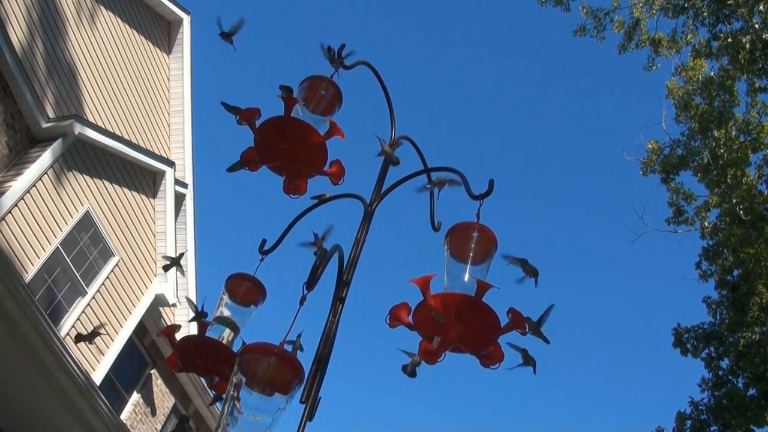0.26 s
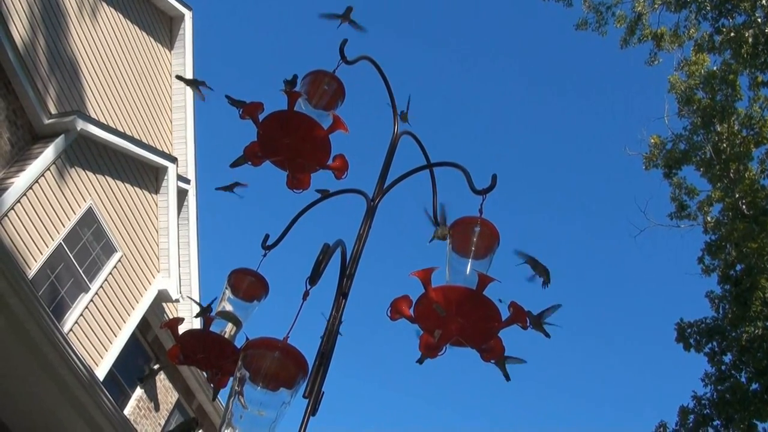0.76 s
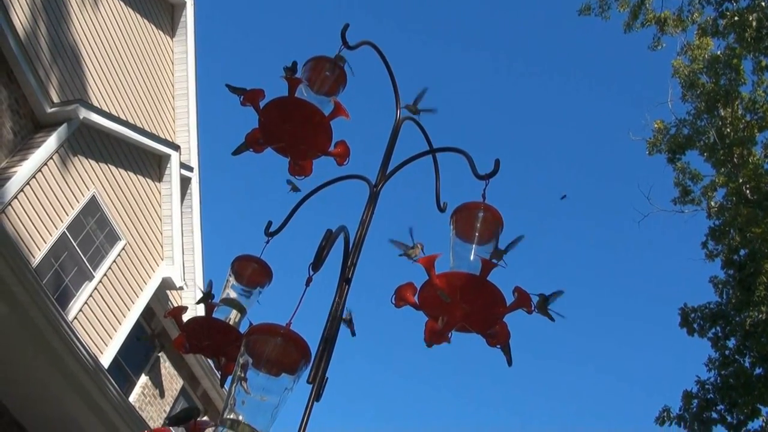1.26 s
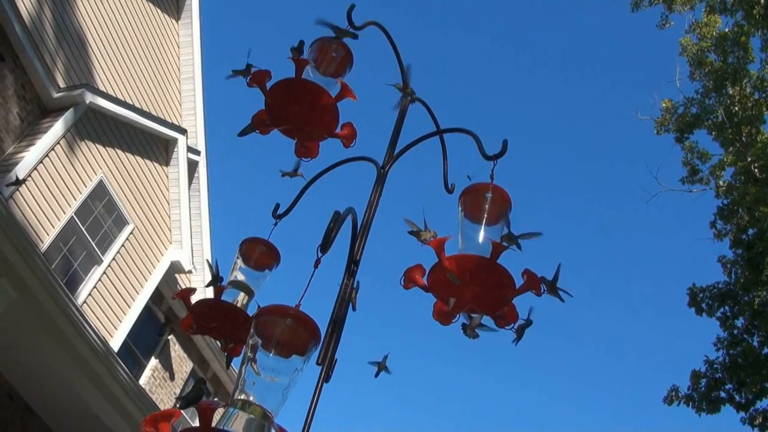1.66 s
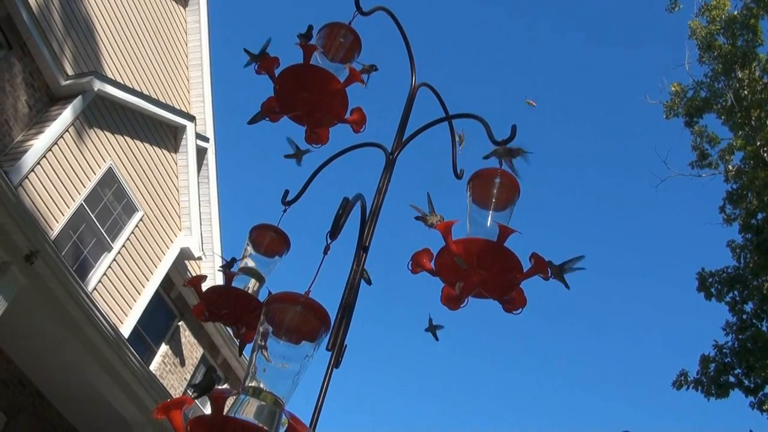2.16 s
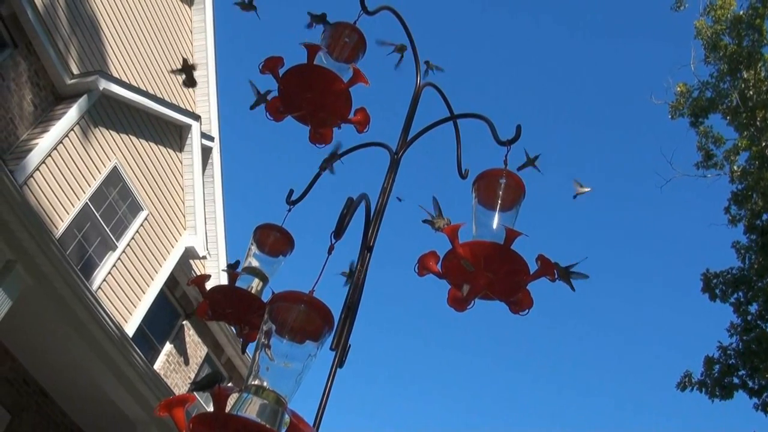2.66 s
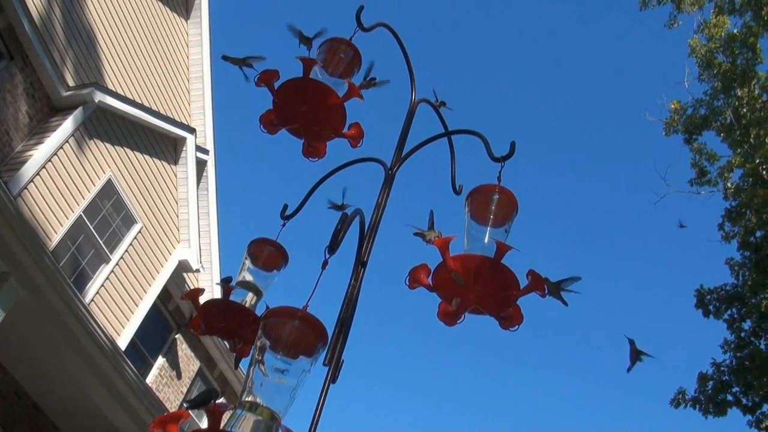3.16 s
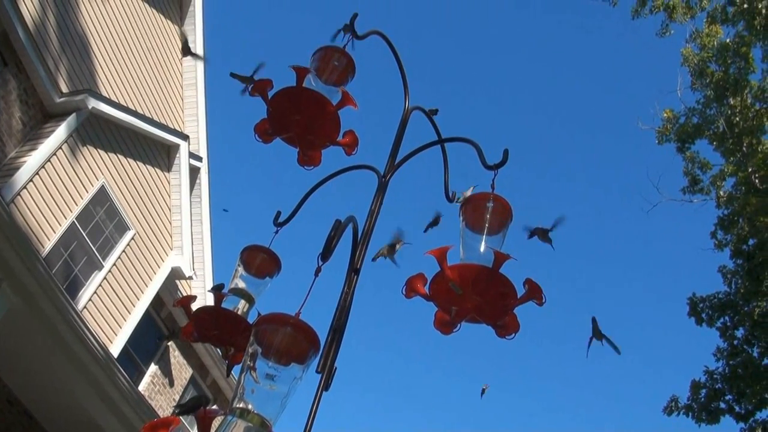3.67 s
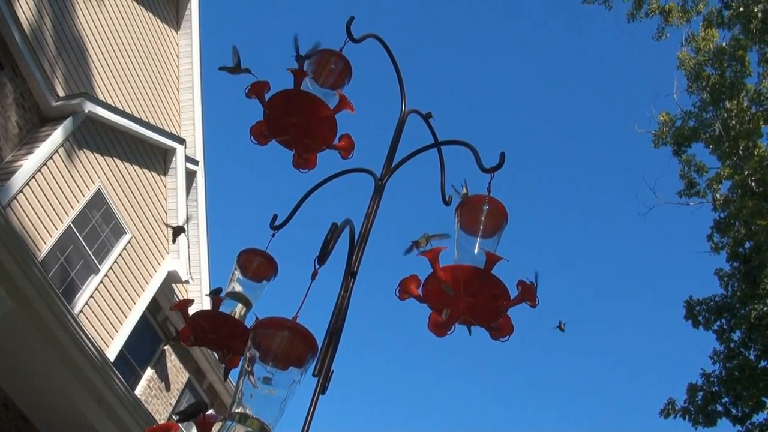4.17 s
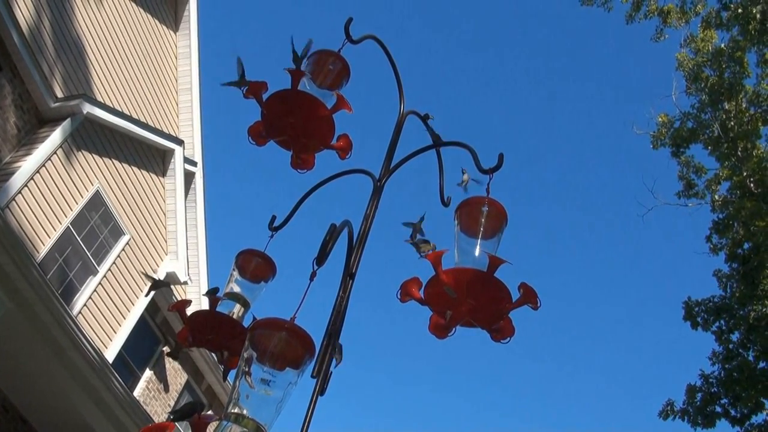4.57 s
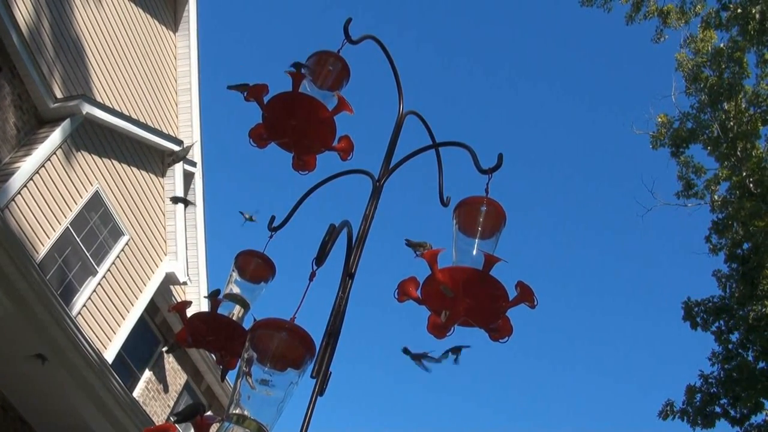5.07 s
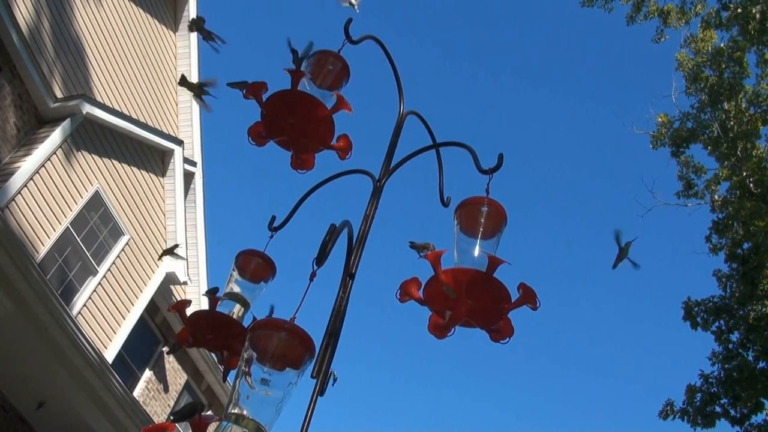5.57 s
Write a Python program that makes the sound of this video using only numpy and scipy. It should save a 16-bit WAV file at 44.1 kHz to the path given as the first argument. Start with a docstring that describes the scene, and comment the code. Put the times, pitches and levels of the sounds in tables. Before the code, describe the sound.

Beside a house, several hummingbirds hover around feeders. Their wings make a continuous low hum that swells, sags and beats unevenly, with soft airy swishing. Over it come tiny high chips, thin whistles, twittering trills and scratchy rasps, thickest around one second and again near three, then thinning out. Faint insects shrill steadily over a light outdoor hush. Stereo microphone close to the birds, calls scattered left and right with a short wall echo.

```python
"""Hummingbirds at the feeders

Hummingbirds crowd round garden feeders beside a house. Their wings hum at twice the wingbeat, beat against each other
and swish on each stroke. They squabble in thin whistles, falling chips, twittering trills, harsh rasps and a buzzy
scold, made from gliding tones, harmonics and hiss; feathers scuffle and dry snaps tick. The house wall echoes all
these but the steady wings; filtered noise makes insects shrilling in the trees over a faint outdoor hush."""
import sys
import numpy as np
from scipy import signal
from scipy.fft import rfft, irfft
from scipy.io import wavfile
from scipy.ndimage import map_coordinates

SR = 44100
rng = np.random.default_rng(int(sys.argv[2]) if len(sys.argv) > 2 else 0)


def to_wav(s):
    """Save 16-bit WAV."""
    ch = np.atleast_2d(s).T  # columns
    pcm = np.round(np.clip(ch, -1, 1) * 32767)  # PCM
    wavfile.write(sys.argv[1], SR, pcm.astype(np.int16))


N = 256662
T = np.arange(N) / SR
TOP_HZ = 15700  # nothing much is heard above this
BEAK_HZ = 12100  # the open beak rings here, towards where the bird faces

# Chips that start higher ring brighter, with less of the fundamental (the lowest harmonic).
# Each row: start pitch in Hz, brightest frequency in Hz, level of the added fundamental in dB.
CHIP_TONES = [(2514, 5370, -7), (2800, 7090, -23)]


def undb(db):
    """Turn decibels into a gain."""
    return 10 ** (np.asarray(db) / 20)


def level(x, db):
    """Scale a sound to an rms (average strength) in dB."""
    return x * undb(db) / np.sqrt(np.mean(x ** 2))


def walk(rate, size=N):
    """Smooth chance with a spread near 1 that turns about rate times a second."""
    points = rng.standard_normal(4096)
    return map_coordinates(points, [np.arange(size) / SR * rate], order=3, mode="wrap")


def colour(x, points):
    """Filter by a spectrum of (Hz, dB) points."""
    hz, db = np.transpose(points)
    bins = np.maximum(np.fft.rfftfreq(N, 1 / SR), 1)
    gain = undb(np.interp(np.log(bins), np.log(hz), db))
    return irfft(rfft(x) * gain, N)


def diffuse(alike_hz):
    """Noise from all round: long waves reach both microphones alike, short ones do not."""
    mid, side = rfft(rng.standard_normal((2, N)))
    alike = np.sinc(np.fft.rfftfreq(N, 1 / SR) / alike_hz / 2) * .9
    mid = mid * np.sqrt(1 + alike)
    side = side * np.sqrt(1 - alike)
    return irfft(np.array([mid + side, mid - side]), N)


def air(size, low_hz=2300, high_hz=11000):
    """Turbulent air: a broad hiss with an rms of 1."""
    band = signal.butter(2, [low_hz, high_hz], "band", fs=SR, output="sos")
    return level(signal.sosfilt(band, rng.standard_normal(size)), 0)


def add(out, s, x, pan_db):
    """Place a call; the microphone turned away hears it softer and a little later."""
    for channel, side in enumerate((.5, -.5)):
        i = max(int(s * SR - side * pan_db / 6), 0)
        out[channel, i:i + len(x)] += undb(side * pan_db) * x[:N - i]


def progress(length):
    """Run from 0 to 1 through a call."""
    return np.linspace(0, 1, int(length * SR))


def swell(u, rise, fall):
    """A call's loudness shape, with rise and fall as shares of its length."""
    ramp = np.minimum(u / rise, (1 - u) / fall)
    return np.sin(np.pi / 2 * np.clip(ramp, 0, 1)) ** 2


def syrinx(hz, bright_hz, octaves, skirt_db, beak_db=-30, cut_hz=13300):
    """The bird's voice: harmonics of a moving pitch ring broadly in the throat and narrowly in the beak."""
    k = np.arange(1, 10)[:, None]  # harmonic numbers
    throat = np.exp(-.5 * (np.log2(k * hz / bright_hz) / octaves) ** 2)
    skirt = undb(skirt_db) / (1 + bright_hz / (k * hz))
    beak = undb(beak_db) * np.exp(-(10 * np.log(k * hz / BEAK_HZ)) ** 2)
    # the very top is cut
    top_cut = (k * hz < SR / 2) / (1 + (k * hz / cut_hz) ** 16)
    gain = (throat + skirt + beak) * top_cut
    return np.sum(gain * np.sin(k * 2 * np.pi * np.cumsum(hz) / SR), axis=0)


def wing(stroke_hz):
    """One bird's wing tone and the puffs of air that its strokes throw."""
    # Up and down stroke push nearly alike, so the second tone leads.
    # Each row: multiple of the wingbeat, typical level in dB against the other rows.
    wing_orders = [(1, -28), (2, 1.5), (4, -13.5), (6, -24)]
    beat = np.pi * np.cumsum(stroke_hz) / SR  # two strokes make one wingbeat
    tone = 0
    for k, db in wing_orders:
        strength = undb(db + 2.0 * walk(9.8))
        tone = tone + strength * np.sin(k * beat + 0.28 * k * walk(9))
    puffs = 1 + 0.73 * np.cos(2 * beat)
    return level(tone, 0), puffs


def wings(near_db=-6.5, flock_db=-6.5, swish_db=-58.5, lag_s=0.0011, count=4):
    """The nearest bird leads; others, each at its own rate, waver, drift from side to side and beat against it."""
    # The hum's loudness throbs and sags unevenly, as several wing tones beat together.
    # Each row: time in seconds, level in dB before the shares of the near bird and the flock.
    hum_levels = [(0.0, -49), (0.36, -44), (0.49, -54), (0.73, -43.5), (0.92, -51), (1.09, -46),
                  (1.52, -52.5), (1.64, -46), (1.81, -58), (2.1, -46.5), (2.55, -54), (2.78, -48.5),
                  (3.84, -46.5), (4.33, -53), (4.4, -49), (4.8, -49), (5.15, -47), (5.81, -53.5)]
    # Each row: frequency in Hz, strength of the swish there in dB.
    swish_colour = [(68, -20), (95, 12.5), (150, -7), (440, 9), (670, -17.5), (1200, -35)]
    hum_db = np.interp(T, *np.transpose(hum_levels))
    near, puffs = wing(104 * (1 + 0.041 * walk(14)))  # about 104 strokes a second
    flock = 0
    for rate_hz in np.linspace(94, 116, count):
        tone, _ = wing(rate_hz * (1 + 0.04127 * walk(10)))
        # drifting left and right shifts both the timing and the loudness
        side = np.outer([.5, -.5], walk(1.73))
        shifted = np.interp(T + lag_s * side, T, tone)
        flock = flock + shifted * undb(2 * walk(6.5) + side)
    hum = (level(near, near_db) + level(flock, flock_db)) * undb(hum_db)
    # the swish swells with the hum, but by less
    swish = colour(diffuse(alike_hz=656) * puffs, swish_colour) * undb(0.74 * hum_db)
    return hum + level(swish, swish_db)


def garden(hush_db=-53.0, insect_db=-56):
    """A smooth outdoor hush and a chorus of insects shrilling in the trees, both from filtered noise."""
    # Spectrum of the hush. Each row: frequency in Hz, strength in dB.
    hush_colour = [(60, 9.5), (200, 12), (1300, -0.5), (5500, -5), (9500, -6.5), (15800, -14)]
    # Spectrum of the insects. Each row: frequency in Hz, strength in dB.
    insect_colour = [(5000, -66), (7000, -14), (7700, -3.5), (8050, -7.5), (8700, -22.5), (10000, -87)]
    hush = colour(diffuse(alike_hz=253), hush_colour) * undb(.5 * walk(1.0))
    # the insects waver slowly and flicker fast
    insects = colour(diffuse(alike_hz=313), insect_colour) * undb(.5 * walk(1.98) + walk(90))
    return level(hush, hush_db) + level(insects, insect_db)


def chip(start_hz, bright_hz, root_db, beak_db, length=0.03, drop=0.66):
    """The syrinx slackens at once: a clear stack of harmonics dives, never twice at quite the same speed."""
    u = progress(length)
    dive = np.exp(-drop * u * (1 + .1 * rng.standard_normal()))
    hz = start_hz * dive * (1 + .024 * walk(2400, len(u)))
    voice = level(syrinx(hz, bright_hz, octaves=0.27, skirt_db=-8.0, beak_db=beak_db), 0)
    root = level(np.sin(2 * np.pi * np.cumsum(hz) / SR), root_db)
    flutter = undb(2 * walk(500, len(u)))
    return (voice + root + .28 * air(len(u))) * swell(u, .14, .75) * flutter


def add_far_chips(out, far_db=-60, far_until_s=3.7, count=14):
    """Faint chips from birds further off start at chance times, weaker with distance."""
    start_hz, bright_hz, root_db = CHIP_TONES[0]
    for when, pitch, side, distance in rng.uniform(-1, 1, size=(count, 4)):
        far = chip(start_hz * (1 + pitch / 10), bright_hz, root_db, beak_db=-np.inf)
        far = level(far, far_db) / (1 + abs(distance))
        add(out, (when + 1) / 2 * far_until_s, far, 2 * side)


def rasp(length, bright_hz, pitch_share=.53, flutter_hz=220, depth=0.162, sag=.33):
    """A pressed syrinx flutters in fast, uneven pulses while its pitch sags and grows hoarse."""
    u = progress(length)
    flutter = np.sin(2 * np.pi * (u * length * flutter_hz + .25 * walk(130, len(u))))
    hoarse = (.04 + .06 * u) * walk(2200, len(u))
    hz = pitch_share * bright_hz * np.exp(depth * flutter - sag * u + hoarse)
    voice = level(syrinx(hz, bright_hz, octaves=0.38, skirt_db=-3), 0)
    breath = .6 * u * air(len(u), 2300)
    pulses = undb(3 * flutter + 2.5 * walk(400, len(u)))
    return (voice + breath) * pulses * swell(u, .25, .55)


def add_rasps(out):
    """Place the harsh rasps of the pressed syrinx."""
    # Each row: start in seconds, length in seconds, level in dB midway between the sides,
    # brightest frequency in Hz, left minus right in dB.
    rasp_rows = [ (0.102, 0.046, -56, 5450, 10), (0.62, 0.052, -54, 8370, -4),
                 (1.052, 0.063, -47.5, 8460, -5), (1.229, 0.058, -45, 7430, 0),
                 (1.292, 0.065, -48.5, 7220, -7), (1.547, 0.038, -48, 6600, -5.5),
                 (2.533, 0.076, -41.5, 7210, -2), (2.999, 0.03, -51, 8700, -2),
                 (4.263, 0.057, -57.5, 5350, -12.5), (4.601, 0.042, -51, 6360, -4),
                 (4.74, 0.041, -53, 6350, -7)]
    for s, length, db, bright_hz, pan_db in rasp_rows:
        add(out, s, level(rasp(length, bright_hz), db), pan_db)


def whistle(length, start_hz, middle_hz, end_hz, octave_db, waver=0.0077):
    """A nearly pure, slightly unsteady arc with its octave."""
    u = progress(length)
    arc = np.polyfit([0, .5, 1], [start_hz, middle_hz, end_hz], 2)
    hz = np.polyval(arc, u) * (1 + waver * walk(350, len(u)))
    phase = 2 * np.pi * np.cumsum(hz) / SR
    tone = np.sin(phase) + undb(octave_db) * np.sin(2 * phase)
    # loudness flutters with the pressure in the air sacs
    return tone * swell(u, .07, .45) * undb(1.5 * walk(200, len(u)))


def add_whistles(out, straight_s=0.0601, arch_hz_per_s=2040):
    """Place the whistles: the longer one lasts beyond a straight one, the more its pitch arches."""
    # Each row: start in seconds, length in seconds, start pitch in Hz, end pitch in Hz,
    # level in dB midway between the sides, left minus right in dB.
    whistle_rows = [ (.272, 0.077, 7030, 6500, -47, -3.5), (0.889, 0.1, 6400, 5380, -45, -8.5),
                    (0.906, 0.066, 6630, 7000, -45.5, 3), (0.975, 0.036, 7130, 7260, -43.5, 9),
                    (1.013, 0.049, 7120, 7300, -39, 7.5), (2.060, 0.11, 6665, 6660, -41, -8),
                    (2.141, 0.08, 6780, 6850, -48.5, 3), (2.266, 0.073, 7540, 7690, -45, 2),
                    (2.732, 0.062, 6750, 6940, -48.5, -6), (2.755, 0.052, 7690, 8170, -39.5, 3.5),
                    (3.155, .1, 7000, 6490, -46, -7), (3.949, 0.074, 6885, 6760, -41.5, -5.5),
                    (4.03, 0.083, 6360, 6860, -45.5, -4.5), (4.165, 0.085, 6650, 6300, -53.5, -6),
                    (5.204, 0.06, 6560, 6200, -60, -2)]
    for s, length, start_hz, end_hz, db, pan_db in whistle_rows:
        middle_hz = (start_hz + end_hz) / 2 + arch_hz_per_s * (length - straight_s)
        # birds on the right face the microphone, so their octave carries
        octave_db = -14.5 - 1.18 * pan_db
        call = whistle(length, start_hz, middle_hz, end_hz, octave_db)
        add(out, s, level(call, db), pan_db)


def add_chips(out):
    """Place the near chips: higher ones ring brighter, with less fundamental."""
    # Each row: start in seconds, start pitch in Hz, level in dB midway between the sides,
    # left minus right in dB.
    chip_rows = [ (0.293, 2670, -51.5, -7), (0.557, 2560, -56, -2), (1.06, 2350, -58, 4),
                 (1.158, 2230, -57, 9.5), (1.326, 2800, -48, 1), (1.38, 2740, -52.5, -5),
                 (1.4, 3740, -49, -3), (1.441, 2800, -49.5, -5), (1.464, 3800, -52, -5),
                 (1.777, 2286, -57.5, 1), (1.951, 2306, -59, 6), (1.997, 2340, -57.5, 1),
                 (2.38, 2770, -50, -8), (2.627, 3530, -47, -2), (2.697, 3110, -46, -4),
                 (2.712, 3850, -51.5, -6), (2.777, 3120, -47.5, -4), (2.84, 2965, -50.5, -10),
                 (2.974, 2407, -52, -7.5), (3.079, 3430, -54.5, 0.5), (3.1, 3010, -50, -7),
                 (3.18, 2800, -50.5, -8), (3.273, 2680, -52, 0), (3.498, 2794, -48.5, -8.5),
                 (3.556, 2730, -46.5, -7), (3.62, 2710, -50, -8), (4.371, 2336, -56.5, 1),
                 (4.405, 2596, -51, 10.5), (4.435, 2600, -67, -8), (4.848, 2260, -62, 3),
                 (4.87, 2640, -57, -3), (5.257, 2510, -51, 2), (5.55, 2620, -60.5, -6),
                 (5.66, 2640, -60, -2)]
    tone_start_hz, tone_bright_hz, tone_root_db = np.transpose(CHIP_TONES)
    for s, start_hz, db, pan_db in chip_rows:
        bright_hz = np.interp(start_hz, tone_start_hz, tone_bright_hz)
        root_db = np.interp(start_hz, tone_start_hz, tone_root_db)
        # the beak rings more from the right
        call = chip(start_hz, bright_hz, root_db, beak_db=-28 - 1.6 * pan_db)
        add(out, s, level(call, db), pan_db)


def trill(length, start_hz, end_hz, hook_hz, throat_hz=6900, dip=0.38, droop=.2):
    """The pitch hooks up from below, holds and droops, over and over; each hook sweeps the octave through the throat."""
    u = progress(length)
    cycle = (u * length * hook_hz + .05 * walk(40, len(u))) % 1
    hook = 1 - dip * np.exp(-cycle / .17) - droop * cycle ** 4
    # the trill grows hoarser as it goes on
    hoarse = 1 + (.008 + .05 * u) * walk(2600, len(u))
    hz = (start_hz + (end_hz - start_hz) * u) * hook * hoarse
    push = np.sin(np.pi * np.sqrt(cycle))
    voice = level(syrinx(hz, throat_hz, octaves=0.52, skirt_db=-17, beak_db=-8) * push, 0)
    return (voice + u * push * air(len(u))) * swell(u, .2, .5)


def add_trills(out, sag_hz_per_s=1780):
    """Place the twittering trills, whose top pitch sags steadily."""
    # Each row: start in seconds, length in seconds, rough top pitch at the start in Hz, hooks a second,
    # level in dB midway between the sides, left minus right in dB.
    trill_rows = [ (.461, 0.085, 6890, 80, -53, -8.5), (1.01, 0.13, 6320, 92, -46.5, -5),
                  (1.172, 0.038, 7600, 72, -46.5, -7), (2.942, 0.079, 6820, 77, -52.5, -8),
                  (3.323, 0.068, 6710, 64, -51.5, -9), (3.713, 0.068, 6470, 70, -52.5, -13.5),
                  (3.849, 0.11, 6330, 70, -51.5, -14), (4.716, 0.069, 6430, 68, -53, -8.5)]
    for s, length, start_hz, hook_hz, db, pan_db in trill_rows:
        end_hz = start_hz - sag_hz_per_s * length
        add(out, s, level(trill(length, start_hz, end_hz, hook_hz), db), pan_db)


def scuffle(length, stroke_hz=95):
    """Feathers slap and brush once a stroke, in uneven flurries."""
    u = progress(length)
    cycle = (u * length * stroke_hz + walk(27, len(u)) / 2) % 1
    strokes = (.3 + np.exp(-cycle / .25)) * undb(4 * walk(46, len(u)))
    return air(len(u), 1380, 5600) * strokes * swell(u, 0.11, 0.28)


def add_scuffles(out):
    """Place the rustle of wings as birds scuffle at a port, slightly to the right."""
    # Each row: start in seconds, length in seconds, level in dB midway between the sides.
    scuffle_rows = [(0.996, 0.76, -68.5), (3.381, 0.36, -63.5), (3.886, 0.12, -62)]
    for s, length, db in scuffle_rows:
        add(out, s, level(scuffle(length), db), -2)


def tick(low_hz, length=0.0062):
    """A tiny dry snap of hiss, at most two octaves wide, dying at once."""
    u = progress(length)
    return air(len(u), low_hz, min(4 * low_hz, TOP_HZ)) * (1 - u) ** 2


def add_ticks(out):
    """Place dry snaps, as of bills and wing tips clashing, slightly to the right."""
    # Each row: start in seconds, level in dB midway between the sides, lower edge of the hiss in Hz.
    tick_rows = [(1.929, -45.5, 7860), (3.474, -51, 1800), (3.512, -48.5, 1500), (3.708, -54, 1100)]
    for s, db, low_hz in tick_rows:
        add(out, s, level(tick(low_hz), db), -2)


def buzz(length, pitch_hz, pulse_hz=140):
    """A low, pressed scold: bands of rough harmonics in rapid pulses."""
    u = progress(length)
    hz = pitch_hz * (1 + .065 * walk(1500, len(u)))
    pulses = 1 + .6 * np.sin(2 * np.pi * (u * length * pulse_hz + .2 * walk(60, len(u))))
    voice = level(syrinx(hz, 4700, octaves=0.75, skirt_db=-20), 0)
    return (voice + u * air(len(u)) / 2) * pulses * swell(u, .25, .2)


def add_buzzes(out):
    """Place the buzzy scold of the pressed syrinx."""
    # Each row: start in seconds, length in seconds, average pitch in Hz,
    # level in dB midway between the sides, left minus right in dB.
    buzz_rows = [(3.35, 0.098, 1358, -52.5, -5)]
    for s, length, pitch_hz, db, pan_db in buzz_rows:
        add(out, s, level(buzz(length, pitch_hz), db), pan_db)


def calls():
    """Every call, scuffle and snap in its place."""
    out = np.zeros((2, N))
    add_far_chips(out)
    add_rasps(out)
    add_whistles(out)
    add_chips(out)
    add_trills(out)
    add_scuffles(out)
    add_ticks(out)
    add_buzzes(out)
    return out


def yard(x, wall_s=0.056, wall_db=-19, scatter_db=-6.5, dull_hz=11000):
    """One slap from the house wall and a short scatter from eaves, feeders and trees."""
    t = T[:SR // 2]
    fade = undb(-60 * t / .4)  # the scatter dies by 60 dB in 0.4 s
    build_up = 1 - np.exp(-t / 0.0057)
    tails = rng.standard_normal((2, len(t))) * fade * build_up
    # leaves swallow the top
    tails = signal.sosfilt(signal.butter(2, dull_hz, fs=SR, output="sos"), tails)
    tails *= undb(scatter_db) / np.sqrt(np.sum(tails ** 2, axis=1, keepdims=True))
    tails[:, int(wall_s * SR)] += undb(wall_db)
    return x + signal.fftconvolve(x, tails, axes=1)[:, :N]


def scene():
    """Wings, garden and echoing calls together."""
    return wings() + garden() + yard(calls())


def record(dry, rumble_hz=44):
    """The recorder drops the deepest rumble and cuts the top."""
    dry = signal.sosfilt(signal.butter(3, rumble_hz, "high", fs=SR, output="sos"), dry)
    return signal.sosfilt(signal.ellip(10, .2, 80, TOP_HZ, fs=SR, output="sos"), dry)


dry = scene()
out = record(dry)
to_wav(out)
```